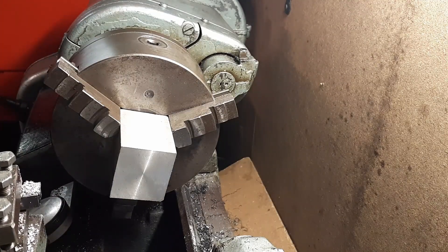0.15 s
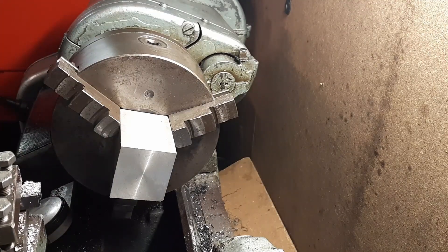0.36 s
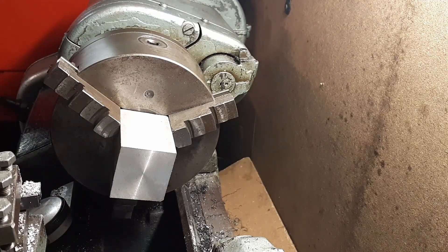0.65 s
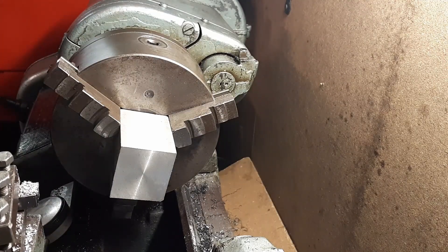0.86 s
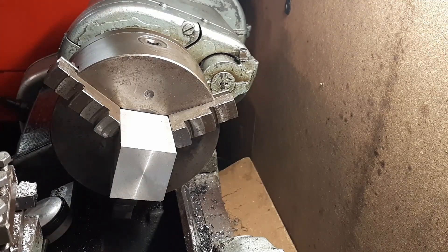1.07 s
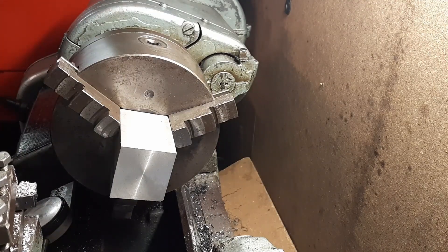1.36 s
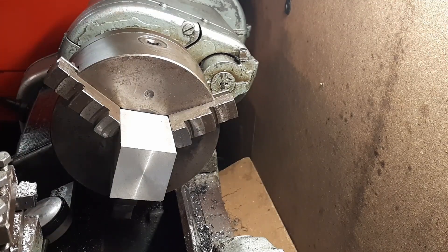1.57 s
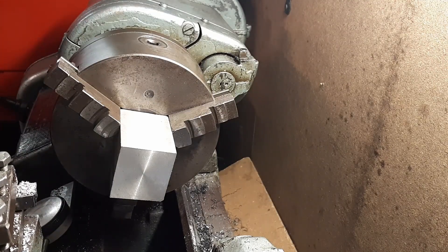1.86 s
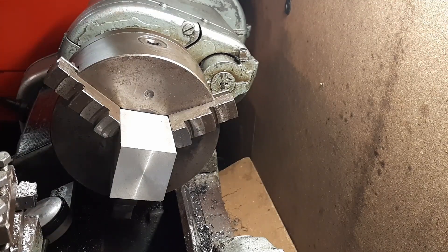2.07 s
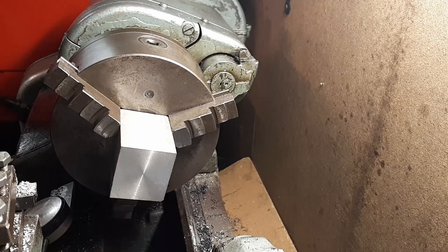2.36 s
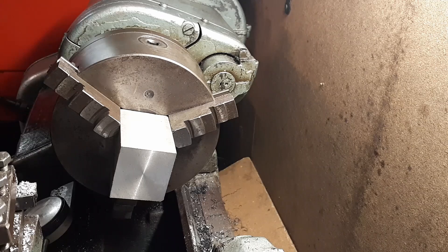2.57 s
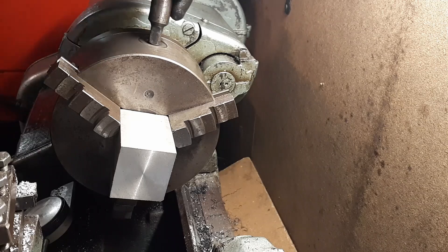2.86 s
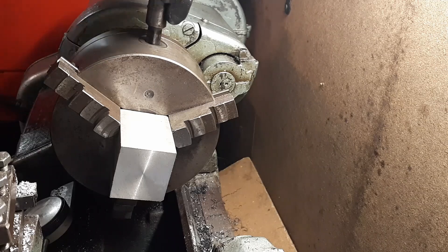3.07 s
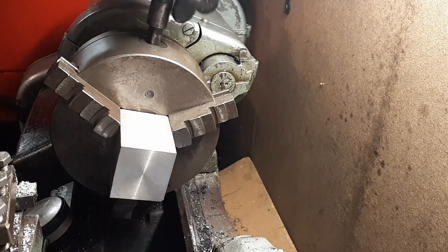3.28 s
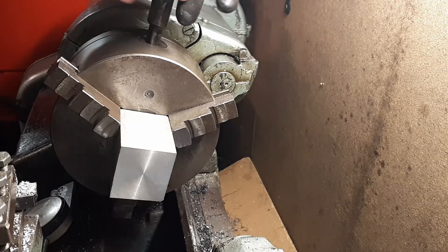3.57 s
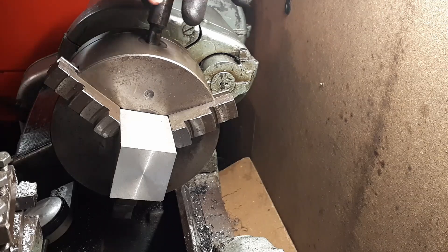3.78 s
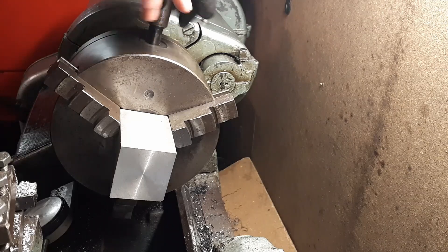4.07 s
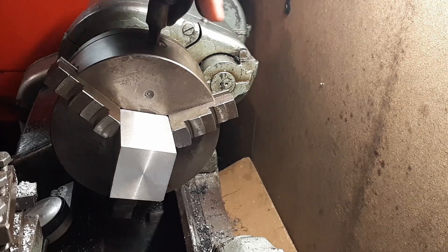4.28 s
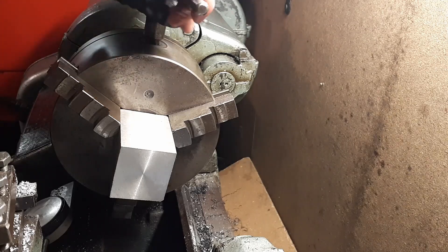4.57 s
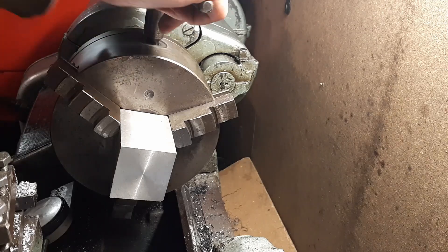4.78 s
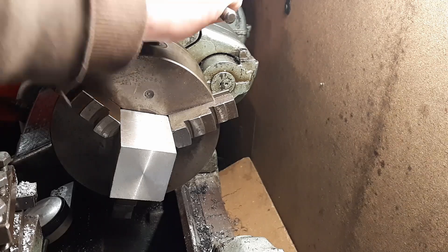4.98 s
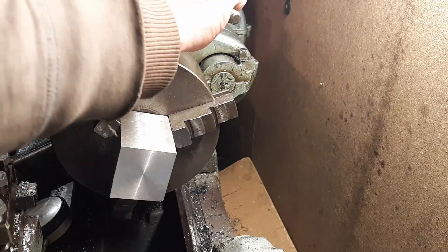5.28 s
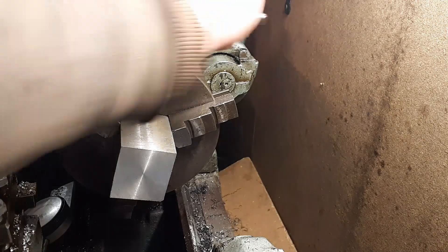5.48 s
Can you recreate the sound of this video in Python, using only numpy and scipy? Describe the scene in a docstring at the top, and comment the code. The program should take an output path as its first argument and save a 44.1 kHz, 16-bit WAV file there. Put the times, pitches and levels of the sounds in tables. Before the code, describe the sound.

Light scrapes and knocks beside a stopped lathe, then sharp steel clanks of a chuck key, hollow machine boom, and faint cloth rubs.

```python
"""Chuck key on a stopped lathe

A metal block sits in the chuck of a stopped lathe in a small workshop. Two knocks sound nearby as a tool is picked up;
the key clatters into its socket, is turned and jolts against the play of the spindle, so that the headstock booms.
Glove and sleeve rub in between, and the arm bumps the machine at the end. Filtered noise makes the contacts, the rubs
and the shop murmur; decaying sines make the clear rings and the boom, and one wavering sine makes a faint squeak."""
import sys
import numpy as np
from scipy import signal
from scipy.fft import rfft, irfft, next_fast_len
from scipy.io import wavfile
from scipy.ndimage import uniform_filter1d

SR = 44100
rng = np.random.default_rng(int(sys.argv[2]) if len(sys.argv) > 2 else 0)


def transcribe(u):
    """Save the signal u as a 16-bit wav file named by the first command-line argument.

    u: samples, shape (n,) or (channels, n), limited to [-1, 1]; the rate is SR.
    q: integer samples, one column per channel.
    """
    v = np.clip(np.atleast_2d(u).T, -1, 1)
    q = np.round(v * 32767).astype(np.int16)
    wavfile.write(sys.argv[1], SR, q)


N = 248283
TIME = np.arange(N) / SR               # seconds through the scene
AGE = np.arange(SR * 9 // 20) / SR     # seconds since a blow

# All levels in the tables are relative; some sources have a trim as well. A colour gives only the shape of a spectrum.

# Steel contacts of the key, and at the end two soft bumps of the arm on the machine. Each row: start in seconds,
# level in dB, contact time in seconds, favoured frequency in Hz, boost there in dB (the clank takes half of it).
METAL_HITS = [(2.8503, -3, 0.0011, 3300, 8), (2.8535, -15, 0.00039, 4760, 10.5),
              (2.8600, -14, 0.00061, 1220, 36), (2.9158, -11, 0.0039, 2420, 32),
              (2.9225, -4.5, 0.0011, 2650, 20.5), (2.9321, -7.5, 0.00048, 3940, -0.5),
              (2.935, -12, 0.00029, 9100, 5), (4.286, -37.5, 0.0073, 793, 17),
              (4.3344, -0.5, 0.0012, 1790, 12), (4.3400, 3, 0.0028, 11500, 3.5),
              (4.3470, -7, 0.0024, 4600, 12), (4.4018, -14, 0.0004, 4060, 11.5),
              (4.528, -35.5, .0006, 4570, 6.5), (4.863, -40, 0.001, 4000, 10),
              (4.9570, -39, 0.0017, 2030, 38), (5.506, -29, 0.0041, 1510, 7),
              (5.573, -29, 0.0056, 1820, 13)]
# Colour of the dense clank of key and chuck. Each row: frequency in Hz, density in dB per Hz.
CLANK_COLOUR = [(90, -20), (200, -3.5), (400, -1), (550, -8), (780, -9.5), (930, -14.5), (1200, -4),
                (2700, -8), (5000, -3), (6400, -12), (7600, -23.5), (8800, -20), (11500, -17.5),
                (16000, -24.5)]
# Clear modes of key and chuck. Each row: frequency in Hz, level in dB, t60 in seconds.
KEY_MODES = [(778, -8, .18), (1225, -7, .08), (1725, -3, .09), (1890, -4, .08), (2080, -7, .1),
             (2240, -6, .09), (2492, -8, .11), (2670, -4, .09), (3362, 1, .11), (3714, -7, .09),
             (4250, -3, .11), (4714, 2, .125), (5005, -5, .1), (5430, -7, .07), (6975, -15, .08),
             (8580, -11, .11), (9135, -11, .1), (11050, -13, .06), (11280, -12, .07), (11800, -16, .09)]
# Shoves on the headstock. Each row: start in seconds, level in dB, favoured frequency in Hz.
SHOVES = [(2.8498, -36, 132), (2.8590, -25, 239), (2.9480, -36, 264), (4.087, -55, 247),
          (4.288, -41.5, 352), (4.306, -34, 284), (4.3400, -21.5, 287), (4.401, -46, 250),
          (4.733, -50, 231), (4.873, -44.5, 221), (5.0050, -63.5, 230), (5.49, -36, 114),
          (5.5700, -57, 134)]
# Modes of headstock and sheet-metal guard. Each row: frequency in Hz, level in dB, t60 in seconds.
HEADSTOCK_MODES = [(108.8, -9.5, 0.45), (127, -12, 0.73), (153, 1.5, 0.33), (176.8, -9.5, 0.51),
                   (222, -10.5, 0.18), (232, -1.5, 0.3), (249.8, -2.5, 0.32), (289.6, -4.5, 0.32),
                   (316, -9, 0.089), (344.6, -3.5, 0.26), (367, -13.5, 0.16), (426, -6.5, 0.19),
                   (659, -15.5, 0.12)]
# Knocks beside the lathe. Each row: start in seconds, level in dB, contact time in seconds, room tail in dB.
KNOCKS = [(1.1430, -9, 0.002, -7), (2.1210, 2.5, 0.0023, -15)]
# One colour for each knock. Each row inside a colour: frequency in Hz, density in dB per Hz.
KNOCK_COLOURS = [
    [(120, -27.5), (175, 12.5), (300, 0.5), (480, 6.5), (780, -15.5), (1150, 0), (1500, -13.5), (2100, -2),
     (2800, -3.5), (4000, -23.5), (6300, -15), (7600, -30.5), (16000, -37.5)],
    [(120, -36.5), (180, -6), (250, 1), (350, -10), (530, -1.5), (640, -6.5), (800, 2.5), (1200, -6),
     (2500, -3), (4800, -10.5), (6500, -28), (7600, -38), (9000, -33.5), (16000, -35)],
]
# Clear modes that both knocks set ringing. Each row: frequency in Hz, level in dB, t60 in seconds.
KNOCK_MODES = [(177, -9, .3), (243, -9, .3), (460, -10, .2), (768, -7, .16), (868, -6, .16),
               (1030, -4, .19), (1140, -3, .2), (1235, -2, .2), (1880, 2, .13), (2122, 3, .14),
               (2375, 2, .12), (2780, -1, .12), (3255, 4, .11), (4248, 1, .12), (4590, -2, .11),
               (4770, -1, .11)]
# Small ticks of things shifting beside the lathe. Each row: start in seconds, level in dB, contact time in seconds.
TICKS = [(1.113, -0.5, 0.0066), (1.274, -4.5, 0.00088), (1.3105, 3, 0.0012), (1.343, 7, 0.0051),
         (1.360, 1, 0.0028), (1.462, -8.5, 0.009), (2.035, -15, 0.005)]
# Rubs of glove, sleeve and metal, one movement each. Each row: start, attack and hold in seconds,
# scrape level in dB, swish level in dB.
RUBS = [(0.335, 0.093, 0.016, -62.5, -60), (0.592, 0.019, 0.03, -58, -62), (0.68, .08, .04, -65.5, -69),
        (0.82, .12, .11, -61, -65.5), (1.24, .12, 0.022, -47, -59), (1.42, 0.027, 0.031, -58.5, -74),
        (1.58, 0.09, .01, -68, -72), (1.745, 0.028, 0.014, -61, -62.5), (1.88, 0.039, .02, -89, -76),
        (2.25, 0.044, .04, -79.5, -72), (2.40, 0.05, 0.028, -74, -69.5), (3.02, 0.032, .025, -70, -69),
        (3.09, 0.077, .025, -68, -60.5), (3.23, 0.033, 0.0094, -73, -66.5), (3.36, 0.056, 0.053, -79, -71),
        (3.68, 0.018, 0.011, -70.5, -69), (3.71, 0.042, 0.022, -70.5, -70), (3.81, 0.016, 0.008, -73, -77),
        (3.935, 0.035, .15, -73.5, -67), (3.99, 0.026, 0.0053, -69.5, -63.5),
        (4.16, 0.076, 0.051, -79.5, -73.5), (4.526, .006, 0.031, -61.5, -62),
        (4.62, 0.065, .11, -58.5, -60.5), (4.82, 0.048, 0.033, -66.5, -59.5),
        (4.945, .02, .015, -60.5, -68), (4.99, 0.064, 0.031, -66.5, -68), (5.183, .006, 0.0038, -83, -71.5),
        (5.485, .028, 0.0069, -48.5, -57.5), (5.555, 0.015, .005, -52.5, -57.5),
        (5.58, 0.026, .03, -64, -62.5)]
# Heavier pushes of the hand and turns of the chuck. Each row: start in seconds, hold in seconds, level in dB.
DRAGS = [(0.583, 0.039, -59), (0.75, 0.13, -67), (0.92, 0.19, -62), (1.316, 0.011, -52), (3.368, .25, -73),
         (4.005, 0.082, -60.5), (4.702, 0.18, -59), (4.92, 0.09, -66), (5.479, 0.011, -45),
         (5.54, .06, -54)]
# Between movements the glove never quite rests. The one row: start, attack and hold in seconds.
FIDGET = (0.44, 0.12, 4.7)
# Colours of low drag, metal scrape and cloth swish. Each row: frequency in Hz, density in dB per Hz.
DRAG_COLOUR = [(70, -15.5), (170, -2.5), (250, 1.5), (340, -4), (450, -3.5), (700, -18.5), (1500, -21),
               (4000, -52)]
SCRAPE_COLOUR = [(200, -15.5), (600, -9), (1400, -5), (1800, -0.5), (2200, -1), (2800, 1.5), (4100, -1.5),
                 (5000, -7.5), (6200, -7), (7500, -24), (16000, -37)]
SWISH_COLOUR = [(500, -8.5), (2500, -6.5), (5000, 6.5), (6400, 3.5), (7400, -9.5), (10000, -2), (13000, -1),
                (15500, -1)]
# Resonances that sliding metal excites. Each row: frequency in Hz, width in Hz, level in dB.
SCRAPE_MODES = [(2140, 54, -0.5), (2384, 29, 2), (3080, 64, -4.5), (3970, 94, 1), (4250, 50, -0.5),
                (4600, 64, 0)]
# Two slips of a faint squeak. Each row: start in seconds, hold in seconds, level in dB.
SQUEAKS = [(2.473, .025, -77), (2.578, .045, -79)]
# Colour of the shop murmur. Each row: frequency in Hz, density in dB per Hz.
ROOM_COLOUR = [(25, -18), (74, -3.5), (141, -6.5), (223, -24), (309, -23.5), (714, -33.5), (1700, -35),
               (2110, -35), (3250, -38.5), (5500, -38.5), (8000, -41.5), (12000, -38.5), (15000, -34)]

KEY_RING_DB, KNOCK_RING_DB, DAMPING_CONTACT_S = -22, -29, .0035
NEAR_T60_S, SHOP_T60_S, WALL_CUT_HZ = 0.12, 0.3, 5200
STEREO_HZ = 650          # the two channels part company above this
DRAG_ATTACK_S = 0.026
RELEASE_DB_PER_S = 210   # every movement dies away at this rate
FIDGET_SCRAPE_DB, FIDGET_SWISH_DB, FIDGET_SWING_DB, FIDGET_SWING_HZ = -84, -82, 2, 6
SQUEAK_HZ, SQUEAK_SAG_HZ_PER_S, SQUEAK_ATTACK_S = 2280, 950, .022
ROOM_TONE_DB = -63
SHADE_AT_S, SHADE_WIDTH_S, SHADE_DB = 5.33, 0.19, -5.5
CUTOFF_HZ = 16200


def metal_hits(clank_db=-17.0, tail_db=-18, octaves=0.16):
    """Each hit is a dense clank and a few clear modes of the metal; the point of contact favours one region."""
    out = np.zeros((2, N))
    grid_hz = np.geomspace(40, 18000, 200)
    for start_s, db, contact_s, favoured_hz, boost_db in METAL_HITS:
        boost = .5 * boost_db * nearness(grid_hz, favoured_hz, octaves)
        colour = np.transpose([grid_hz, at_hz(CLANK_COLOUR, grid_hz) + boost])
        sound = from_db(clank_db) * coloured(blow(contact_s, tail_db), colour)
        # a lingering contact damps the ring
        hardness = 1 / (1 + (contact_s / DAMPING_CONTACT_S) ** 2)
        for hz, mode_db, t60 in KEY_MODES:
            favour_db = 8 * (nearness(hz, favoured_hz, .3) - .35) + rng.normal()
            strength = from_db(KEY_RING_DB + mode_db + favour_db) * hardness
            sound += strength * ringing(hz, t60, contact_s)
        add(out, start_s, from_db(db) * sound)
    return out


def headstock(favour_db=9, octaves=0.43, swell_s=0.028, phase_spread=0.18, pan_db=-0.8):
    """Each shove swells into the low modes of the machine, a touch to the right."""
    out = np.zeros((2, N))
    for start_s, db, favoured_hz in SHOVES:
        for k, (hz, mode_db, t60) in enumerate(HEADSTOCK_MODES):
            favour = favour_db * (nearness(hz, favoured_hz, octaves) - 0.5)
            # neighbouring modes start in opposite directions
            strength = (-1) ** k * from_db(db + mode_db + favour)
            phase = phase_spread * rng.standard_normal((2, 1))
            wave = np.sin(2 * np.pi * hz * AGE + phase)
            add(out, start_s, strength * wave * fade(t60) * (1 - fade(swell_s)))
    return out * from_db([[pan_db], [-pan_db]])


def knocks(level_db=-16.0):
    """Two dry knocks, each with its own colour, and the modes that they share."""
    out = np.zeros((2, N))
    for (start_s, db, contact_s, tail_db), colour in zip(KNOCKS, KNOCK_COLOURS):
        sound = from_db(level_db) * coloured(blow(contact_s, tail_db), colour)
        for hz, mode_db, t60 in KNOCK_MODES:
            # the ring follows the colour of the knock by half
            strength = from_db(KNOCK_RING_DB + mode_db + .5 * at_hz(colour, hz))
            sound += strength * ringing(hz, t60, contact_s)
        add(out, start_s, from_db(db) * sound)
    return out


def ticks(level_db=-46, tail_db=-12):
    """Light touches with the colour of the scraping surfaces."""
    out = np.zeros((2, N))
    for start_s, db, contact_s in TICKS:
        touch = coloured(blow(contact_s, tail_db), SCRAPE_COLOUR)
        add(out, start_s, from_db(level_db + db) * gritty_metal(touch))
    return out


def rubbing(scrape_gain_db=-0.5, swish_gain_db=3):
    """A low drag, the scrape of things sliding on metal and the lighter swish of cloth."""
    scrape_effort, swish_effort, drag_effort = efforts()
    drag = drag_effort * friction(DRAG_COLOUR, grain_db=-1.0, catches_per_s=93)
    grit = friction(SCRAPE_COLOUR, grain_db=4.5, catches_per_s=350)
    scrape = from_db(scrape_gain_db) * scrape_effort * gritty_metal(grit)
    cloth = friction(SWISH_COLOUR, grain_db=1.5, catches_per_s=260)
    swish = from_db(swish_gain_db) * swish_effort * cloth
    return drag + scrape + swish


def efforts():
    """Strength of scrape, swish and drag over time; overlapping movements add in power."""
    fidget = stroke(*FIDGET) * from_db(FIDGET_SWING_DB * wander(FIDGET_SWING_HZ))
    power = (from_db([[FIDGET_SCRAPE_DB], [FIDGET_SWISH_DB]]) * fidget) ** 2
    for start_s, attack_s, hold_s, scrape_db, swish_db in RUBS:
        power += (from_db([[scrape_db], [swish_db]]) * stroke(start_s, attack_s, hold_s)) ** 2
    drag_power = np.zeros(N)
    for start_s, hold_s, db in DRAGS:
        drag_power += (from_db(db) * stroke(start_s, DRAG_ATTACK_S, hold_s)) ** 2
    return np.sqrt([*power, drag_power])


def stroke(start_s, attack_s, hold_s):
    """Envelope of one movement: it gathers speed, holds and dies away."""
    age = TIME - start_s
    released_s = np.maximum(age - attack_s - hold_s, 0)
    return np.clip(age / attack_s, 0, 1) ** 2 * from_db(-RELEASE_DB_PER_S * released_s)


def friction(colour, grain_db, catches_per_s):
    """Surfaces catch and slip many times a second, so the hiss comes in small uneven grains."""
    catch_times = np.cumsum(rng.exponential(1, 8000)) / catches_per_s
    grip_db = grain_db * np.interp(TIME, catch_times, rng.standard_normal(len(catch_times)))
    grip = from_db(grip_db)
    return coloured(diffuse(N) * grip / np.sqrt(np.mean(grip ** 2)), colour)


def gritty_metal(x):
    """Grit under sliding metal sets narrow resonances singing."""
    rings = 0
    for hz, width_hz, db in SCRAPE_MODES:
        b, a = signal.iirpeak(hz, hz / width_hz, fs=SR)
        rings = rings + from_db(db) * signal.lfilter(b, a, x)
    return .7 * (x + 1.5 * rings)


def squeak(waver=0.0059, waver_hz=100):
    """A thin, unsteady stick-slip tone that sinks a little."""
    hz = SQUEAK_HZ - SQUEAK_SAG_HZ_PER_S * np.clip(TIME - SQUEAKS[0][0], 0, 1)
    hz = hz * (1 + waver * wander(waver_hz))
    level = sum(from_db(db) * stroke(start_s, SQUEAK_ATTACK_S, hold_s) for start_s, hold_s, db in SQUEAKS)
    return level * np.sin(2 * np.pi * np.cumsum(hz) / SR)


def room_tone():
    """The murmur of the shop is steady coloured noise, dimmed once as the passing sleeve shades the microphones."""
    shade_db = SHADE_DB * np.exp(-((TIME - SHADE_AT_S) / SHADE_WIDTH_S) ** 2)
    return from_db(ROOM_TONE_DB + shade_db) * coloured(diffuse(N, bass_side_db=-12.0), ROOM_COLOUR)


def blow(contact_s, tail_db, crack_db=4, crack_t60=0.029, direct_db=12):
    """A crack, dense reflections from the machine and back wall, and the duller tail of the shop."""
    decay = fade(NEAR_T60_S) + from_db(crack_db) * fade(crack_t60) + from_db(direct_db) * fade(0.0033)
    near = diffuse(len(AGE)) * decay
    far = butter(diffuse(len(AGE)), WALL_CUT_HZ, "low", order=1) * fade(SHOP_T60_S)
    onset = 1 - np.exp(-AGE / contact_s)
    sound = (near + from_db(tail_db) * far) * onset
    # level the broad spectrum; only the fine ripple of the reflections is left to chance
    power = uniform_filter1d(np.mean(np.abs(rfft(sound)) ** 2, axis=0), size=70)
    hz = np.arange(1, len(power)) * SR / len(AGE)
    return coloured(sound, np.transpose([hz, -10 * np.log10(power[1:])]))


def ringing(hz, t60, contact_s):
    """A struck mode is a close, beating pair; each microphone hears it by its own path."""
    pair_hz = hz + np.array([0, 14])[:, None, None]
    mode_turns = rng.random((2, 1, 1))
    path_turns = .5 * rng.random((2, 2, 1))
    waves = np.sin(2 * np.pi * (pair_hz * AGE + mode_turns + path_turns))
    return (waves[0] + .3 * waves[1]) * fade(t60) * (1 - fade(7 * contact_s))


def fade(t60):
    """Exponential decay after a blow, down 60 dB after t60 seconds."""
    return np.exp(-np.log(1000) * AGE / t60)


def diffuse(size, bass_side_db=-17):
    """Stereo noise: alike at both microphones in the bass, unrelated in the treble."""
    mid, side = rng.standard_normal((2, size))
    side = butter(side, STEREO_HZ, "high", order=2) + from_db(bass_side_db) * rng.standard_normal(size)
    return np.array([mid + side, mid - side]) / np.sqrt(2)


def coloured(x, spectrum):
    """Causal (minimum-phase) filter with the given spectrum; white noise keeps its power."""
    size = 2 * next_fast_len(x.shape[-1])
    gain = from_db(at_hz(spectrum, np.arange(size // 2 + 1) * SR / size))
    cepstrum = irfft(np.log(gain / np.sqrt(np.mean(gain ** 2))))
    # folding the cepstrum forward in time makes the filter minimum-phase
    cepstrum[1:size // 2] *= 2
    cepstrum[size // 2 + 1:] = 0
    response = np.exp(rfft(cepstrum))
    return irfft(rfft(x, size) * response)[..., :x.shape[-1]]


def wander(rate_hz):
    """Slow chance with spread 1: low-passed noise."""
    slow = butter(rng.standard_normal(N), rate_hz, "low", order=2)
    return slow / slow.std()


def nearness(hz, centre_hz, octaves):
    """Bell-shaped weight around a frequency."""
    return np.exp(-(np.log2(hz / centre_hz) / octaves) ** 2)


def at_hz(points, hz):
    """Read a spectrum on a log-frequency axis."""
    f, level = np.transpose(points)
    return np.interp(np.log(np.maximum(hz, 1)), np.log(f), level)


def butter(x, hz, kind, order):
    """Plain high- or low-pass."""
    return signal.sosfilt(signal.butter(order, hz, kind, fs=SR, output="sos"), x)


def from_db(db):
    """Decibels to gain."""
    return 10 ** (np.asarray(db) / 20)


def add(out, start_s, sound):
    """Mix a sound in at its start time."""
    start = round(start_s * SR)
    out[:, start:start + sound.shape[-1]] += sound[..., :N - start]


def scene():
    """The handling sounds over the low murmur of the shop."""
    return metal_hits() + headstock() + knocks() + ticks() + rubbing() + squeak() + room_tone()


def record(dry):
    """A steep elliptic low-pass cuts off the top."""
    return signal.sosfilt(signal.ellip(10, .2, 80, CUTOFF_HZ, fs=SR, output="sos"), dry)


dry = scene()
out = record(dry)
transcribe(out)
```